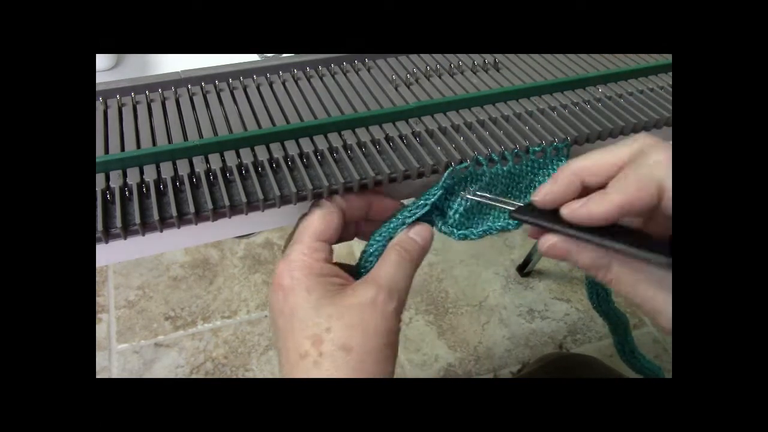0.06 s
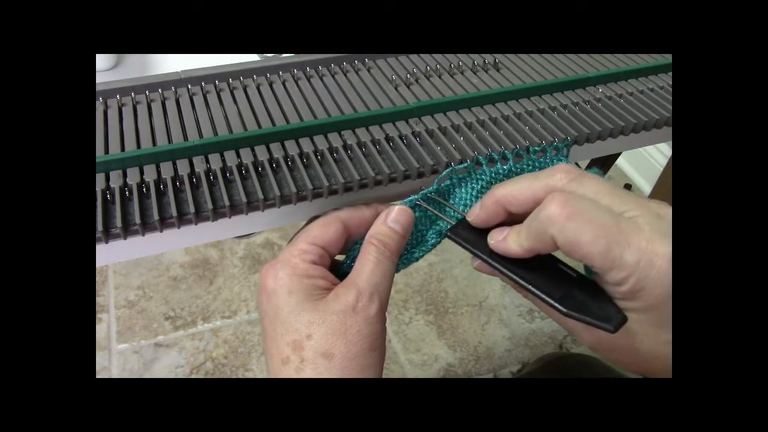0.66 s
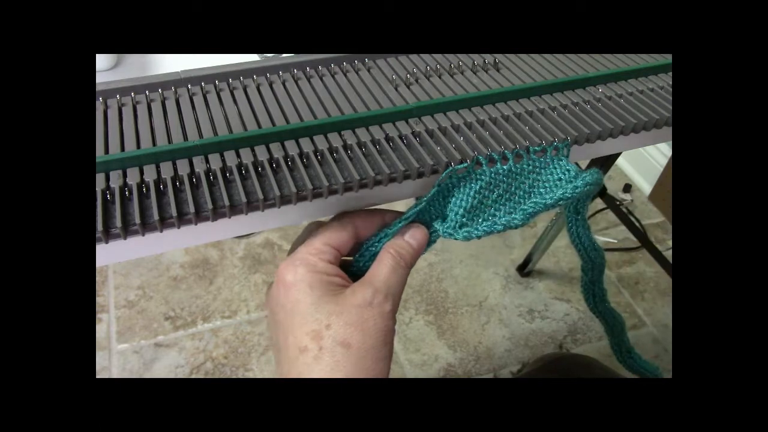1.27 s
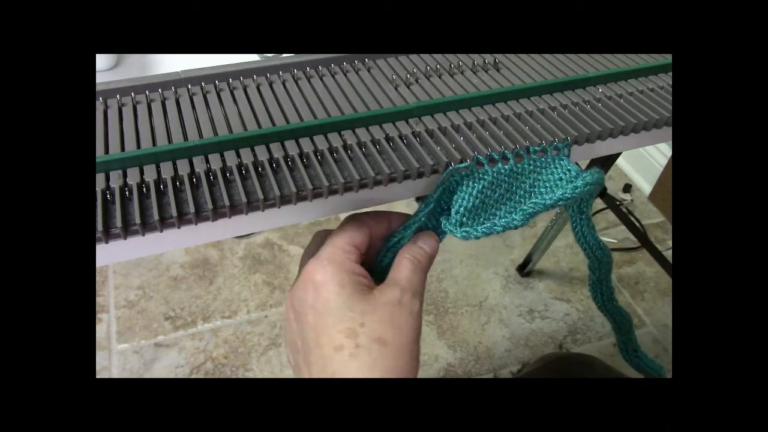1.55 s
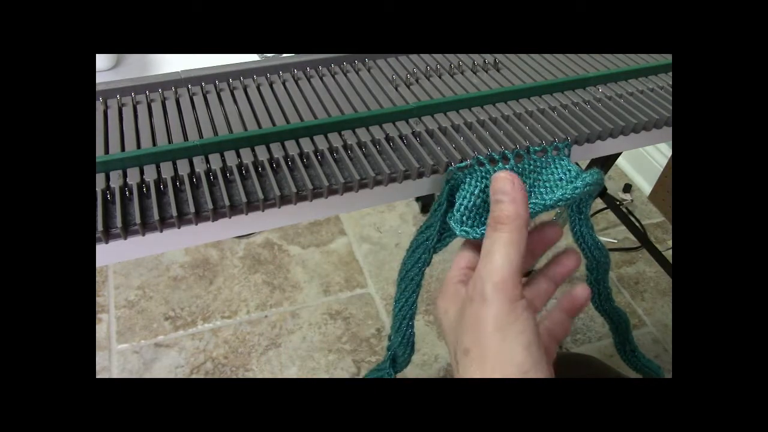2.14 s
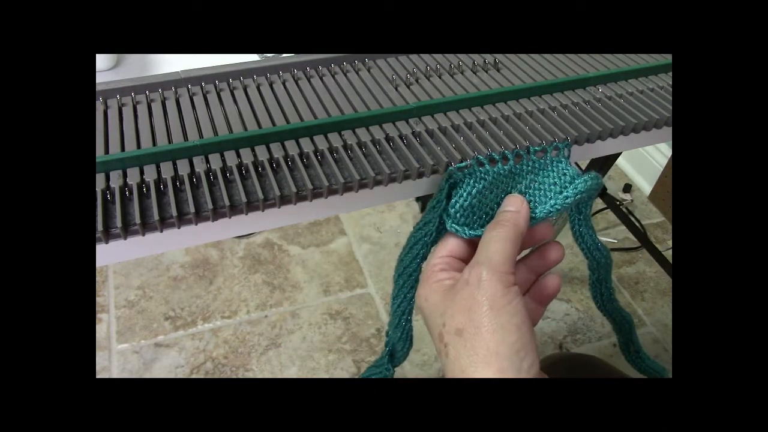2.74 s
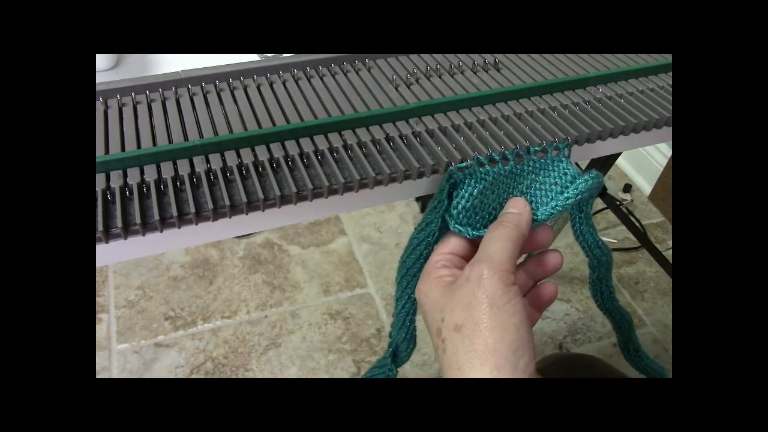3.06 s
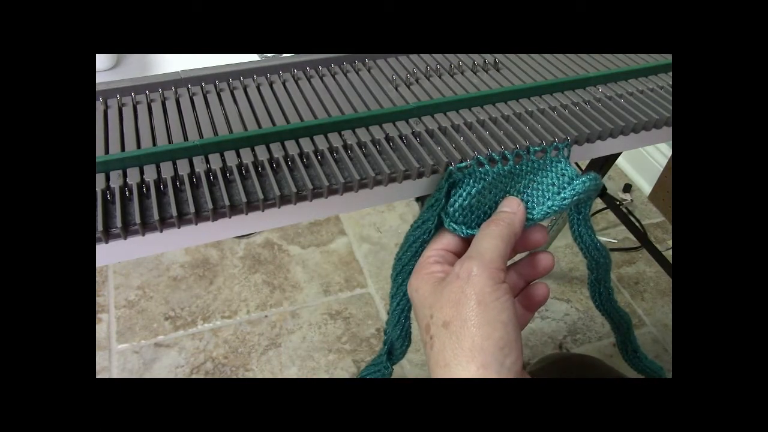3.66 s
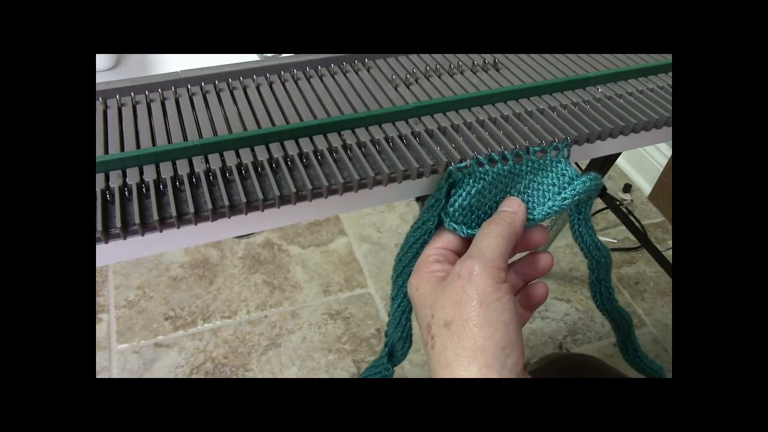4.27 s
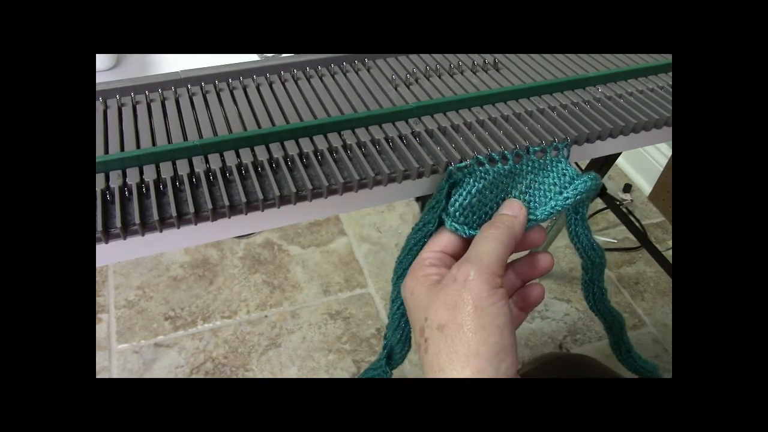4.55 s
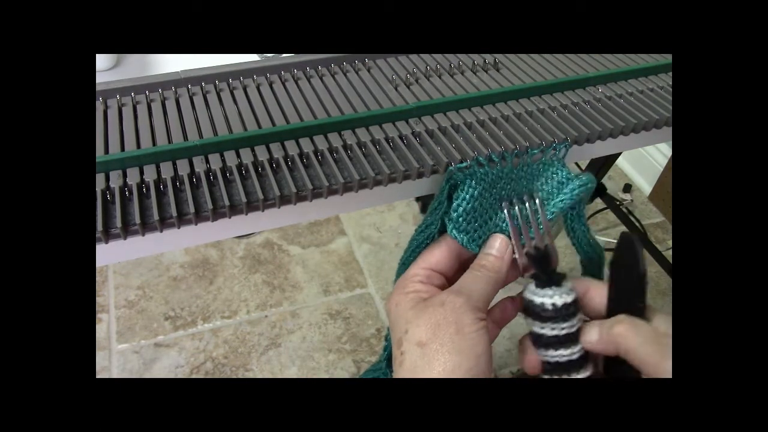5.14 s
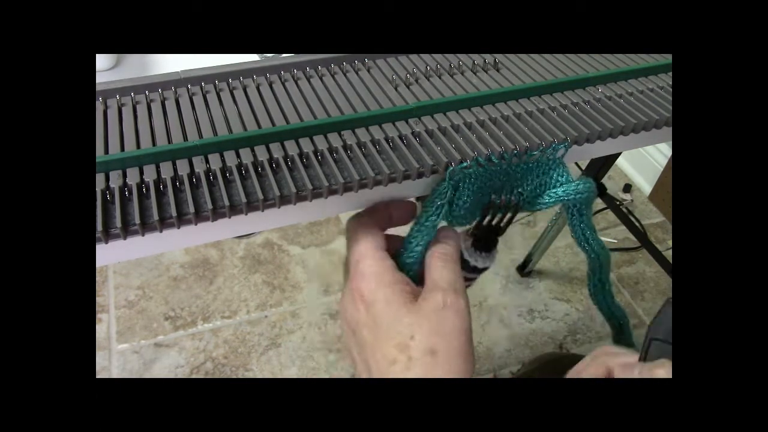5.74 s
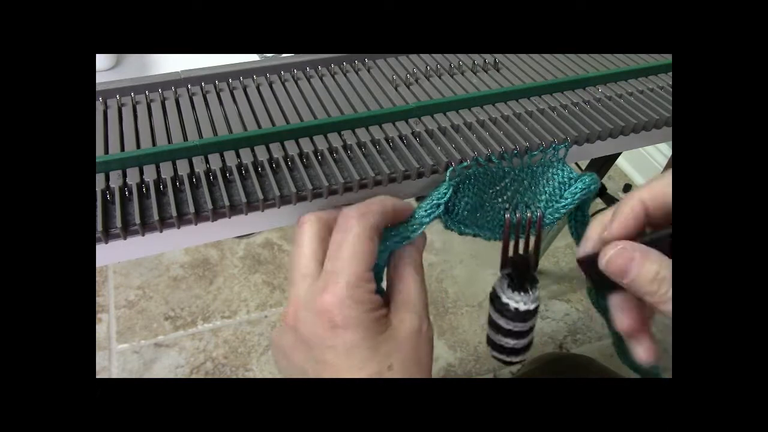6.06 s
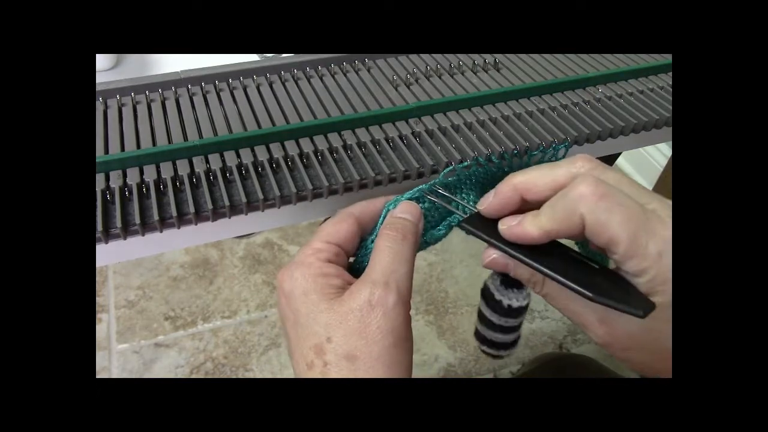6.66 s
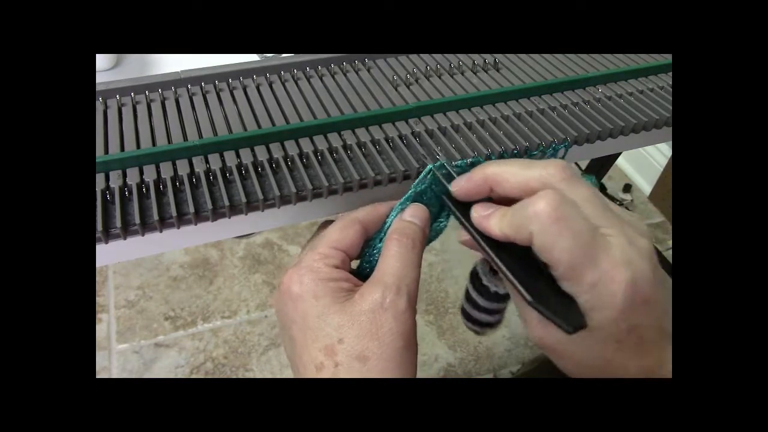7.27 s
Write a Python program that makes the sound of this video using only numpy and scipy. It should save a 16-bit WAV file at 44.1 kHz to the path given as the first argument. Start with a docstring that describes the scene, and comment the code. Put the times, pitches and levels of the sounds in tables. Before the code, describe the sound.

A low, steady hush fills a small, quiet room, and everything is heard close up. In the first second there are faint dull slides and wool rustles, with tiny metal pings around 0.9 to 1.2 seconds. A soft bump comes at 1.5 seconds, followed by a brief dull slide. From 2 to 3.8 seconds a steel tool makes light, irregular ticks, short scrapes and thin pings on knitting machine needles. At 3.9 seconds something heavy lands on a table with a loud, rattling clunk that rings briefly, by far the loudest event. After a lull, yarn rustles faintly from about 5.2 to 6.2 seconds as a claw weight is hooked into the fabric, with two small ticks and a faint ping near 6 seconds. Needle latches click lightly again from 7.1 seconds, the sharpest click coming at 7.5 seconds.

```python
"""Steel tools tick, scrape and ping on the needles of a knitting machine, close by in a small, quiet room.
Impacts excite the modes of the steel; stick-slip friction makes the scrapes and rubs prongs into ringing.
As a claw weight is picked out, something heavy clunks down and bounces, ringing the table top.
Yarn rustles under tension as the claw is hooked into the fabric, then needle latches click again.
Dull slides, a soft bump and a low hush lie behind."""
import sys
import numpy as np
from scipy import signal
from scipy.fft import rfft, irfft, next_fast_len
from scipy.io import wavfile
from scipy.ndimage import uniform_filter1d, minimum_filter1d

SR = 44100
rng = np.random.default_rng(int(sys.argv[2]) if len(sys.argv) > 2 else 0)


def log_audio(samples):
    """Write samples as a 16-bit WAV file to the path given in sys.argv[1]."""
    # one column per channel
    frames = np.atleast_2d(samples).T
    # limit to full scale, then quantise
    limited = np.clip(frames, -1, 1)
    pcm = np.round(limited * 32767).astype(np.int16)
    wavfile.write(sys.argv[1], SR, pcm)


N = 331191
TIME = np.arange(N) / SR
RING_TIME = TIME[:SR // 4]


def steel(body_db, treble_db, hz, crack_t60, ring_db, spot_db):
    """Impact excitation: a crack and a short ring; the point of contact favours one resonance."""
    # Modes of small steel parts. Each row: frequency in Hz, level in dB, t60 in seconds.
    modes = [(1290, 6, 0.016), (1781, -3.5, 0.022), (3066, -5, 0.032), (4070, 2, 0.012), (4640, 1, 0.029),
             (5090, -18, 0.03), (6485, 3, 0.043), (7000, -4.5, 0.0082), (8220, -9.5, .04),
             (10850, 8, 0.057), (11440, -7, 0.039), (13970, -3.5, .03)]
    hit = burst(crack_t60) + undb(ring_db) * ring(modes, scatter_db=4.5, detune=0.018)
    hit = hit + undb(spot_db) * resonance(hit, hz, width_hz=550)
    body = [(30, body_db - 32), (100, body_db - 9), (500, body_db + 10.5), (1400, body_db + 9)]
    treble = [(7500, treble_db + 1), (11500, treble_db - 5.5), (15500, treble_db - 16)]
    return colour(hit, body + [(2800, 1), (5500, -1.4)] + treble)


def tick(db, body_db, treble_db, hz):
    """One impact on steel; db sets its peak in the bright band where hearing is keenest."""
    hit = steel(body_db, treble_db, hz, crack_t60=0.021, ring_db=-7, spot_db=1)
    bright_band = resonance(hit, 2300, width_hz=2900)
    return undb(db) * hit / abs(bright_band).max()


def clicks():
    """Light impacts between latches, prongs and tools set the steel in free vibration."""
    # Each row: start in seconds, bright-band peak, body and treble in dB, favoured resonance in Hz.
    contacts = [(1.995, -41.5, -11, -10, 4220), (2.0582, -42.5, 7, 7, 3100), (2.2575, -42, -14, -3, 3790),
                (2.4892, -33.5, -19, -11, 1340), (2.7634, -34, -12, 7, 6700), (2.804, -34.5, -22, -2, 6500),
                (3.147, -27.5, -14.5, -8.5, 1890), (3.6041, -37, -17, -4, 11000),
                (3.6331, -38, -4, -4, 4140), (3.709, -38, -7, -1.5, 1340), (3.7489, -42.5, -10, -5, 1230),
                (3.8011, -38, -12, -2, 4620), (3.8185, -34, -20, -9.5, 1300),
                (5.246, -41.5, -2.5, -16, 2160), (5.5662, -39.5, 4.5, -8.5, 1498),
                (7.0796, -46, -1, -23, 4100), (7.0858, -33.5, -12, -9, 2650), (7.1165, -43, 6, -7.5, 1604),
                (7.3397, -44, -7.5, 3, 4170), (7.3585, -40.5, -9.5, -27, 2240),
                (7.487, -37.5, -12.5, 4.5, 4110), (7.5004, -23.5, -17.5, -4.5, 4000)]
    out = np.zeros(N)
    for start, db, body_db, treble_db, hz in contacts:
        add(out, start, tick(db, body_db, treble_db, hz))
    return out


def scrapes():
    """Stick-slip friction: tiny slips drive the steel until the sliding part catches with a tick."""
    # Each row: start and catch in seconds, final level, swell, body and treble in dB, resonance in Hz.
    slides = [(2.031, 2.061, -52.5, 0, -11, -12, 3000), (2.089, 2.1465, -36.5, 13, -11, -4, 3930),
              (2.279, 2.318, -36, 8.5, -11.5, -3.5, 3320), (2.49, 2.525, -48, -2, -10, -3, 4700),
              (2.734, 2.769, -36.5, 17, -8.5, 1.5, 6600), (2.854, 2.953, -50, 2.5, -4, -3.5, 3400),
              (2.973, 2.997, -36.5, 9, -10, -4, 3060), (3.454, 3.519, -53.5, 0.5, -6.5, -10.5, 4200),
              (3.796, 3.88, -52.5, -5, -4.5, -5.5, 4580), (3.885, 3.894, -25.5, 21.5, -7, -18.5, 1778),
              (4.468, 4.517, -61, -4, -26, -8, 4470)]
    overlap_s, catch_db = 0.004, 8  # the tick leads the catch, and the sliding outlasts it, by overlap_s
    out = np.zeros(N)
    for start, catch, db, swell_db, body_db, treble_db, hz in slides:
        progress = RING_TIME / (catch - start)
        onset = np.minimum(RING_TIME / 0.015, 1)
        sliding = start + RING_TIME < catch + overlap_s
        pressure = undb(swell_db * np.minimum(progress - 1, 0)) * onset * sliding
        slips = level(grains(len(RING_TIME), per_s=3000, spread_db=4.5), db) * pressure
        response = unit(steel(body_db, treble_db, hz, crack_t60=0.006, ring_db=-17, spot_db=-10))
        add(out, start, signal.fftconvolve(slips, response))
        add(out, catch - overlap_s, tick(db + catch_db, body_db, treble_db, hz))
    return out


def pings():
    """Forced, then free vibration: friction drives a thin prong ever harder until it slips and rings."""
    # Each row: release in seconds, pitch in Hz, peak in dB, time constant of the rub in seconds.
    releases = [(.934, 3540, -46.5, 0.0026), (1.151, 4080, -35.5, 0.0029), (1.15, 5920, -43, 0.01),
                (1.184, 4040, -52, .006), (2.146, 11150, -28, 0.004), (2.313, 11540, -35.5, 0.011),
                (2.49, 1320, -34, .001), (2.768, 13400, -35, 0.0047), (2.805, 6680, -34, 0.002),
                (3.149, 2050, -32, 0.0014), (3.712, 1350, -40.5, .001), (3.711, 4660, -41, 0.0015),
                (6.021, 2347, -47.5, .02), (6.022, 10000, -53.5, 0.0099)]
    out = np.zeros(N)
    for release, hz, db, rub_s in releases:
        rub = rng.standard_normal(len(RING_TIME)) * np.exp((RING_TIME - RING_TIME[-1]) / rub_s)
        tone = signal.fftconvolve(rub, damped_sine(hz, t60=0.025))
        add(out, release - RING_TIME[-1], undb(db) * tone / abs(tone).max())
    return out


def blows(count):
    """Inelastic bouncing: one edge touches, then the heavy thing lands and chatters ever more weakly."""
    touch_s, touch_db, land_s, land_db = 3.8925, 9.5, 3.8995, 18.5
    gap_s, jitter_s, loss_db = 0.0043, 0.0005, 2.44
    soft_hz, hard_hz, harden_s = 800, 7000, 0.005  # the treble cutoff rises as the contact hardens
    bounce = np.arange(count)
    elapsed = bounce * gap_s
    corner_hz = hard_hz + (soft_hz - hard_hz) * np.exp(-elapsed / harden_s)
    times = land_s + elapsed + jitter_s * rng.standard_normal(count)
    return [(touch_s, touch_db, soft_hz), *zip(times, land_db - loss_db * bounce, corner_hz)]


def clunk():
    """Quick blows excite the table's modes; a soft contact acts as a low-pass filter."""
    # Modes of the table top. Each row: frequency in Hz, level in dB, t60 in seconds.
    modes = [(136, -7, 0.2), (184.2, -7, 0.12), (312.9, -12, 0.65), (400, -8, 0.1), (507, 2.5, 0.32),
             (542, -1.5, 0.11), (613, -2, 0.051), (687, 0, 0.08), (790, 4, 0.06), (850, -1, 0.1),
             (977, -9.5, 0.086), (1130, -8, 0.091), (1372, -3, 0.23), (1503, 3, 0.11), (2180, -1.5, 0.12),
             (2470, -8.5, 0.18), (3490, -7, 0.052), (5013, -8.5, .05)]
    # Spectrum of the clatter. Each row: frequency in Hz, gain in dB.
    clatter_spectrum = [(30, -33.5), (65, -27), (105, -0.5), (190, -6), (340, -5), (480, 5.5), (750, 5.5),
                        (1500, -2), (2700, -3), (4000, -4), (7000, -8), (10000, -15.5), (15000, -28.5)]
    # The table is too small to radiate deep bass. Each row: frequency in Hz, gain in dB.
    bass_loss = [(40, -32), (72, -21), (112, -3), (180, 1)]
    out = np.zeros(N)
    for start, db, corner_hz in blows(count=11):
        clatter = unit(colour(burst(t60=0.08), clatter_spectrum))
        hit = clatter + undb(-6.5) * ring(modes, scatter_db=5.5, detune=0.0018)
        pole = np.exp(-2 * np.pi * corner_hz / SR)
        add(out, start, undb(db) * signal.lfilter([1 - pole], [1, -pole], hit))
    return colour(out, bass_loss)


def yarn():
    """Fibre friction: yarn drawn over fingers and prongs rustles louder with tension, then slips."""
    # Each row: slip time in seconds, level at full tension in dB, rise in seconds, treble in dB.
    strokes = [(.31, -68, .16, -1), (0.934, -55, .015, 3), (1.105, -55, .05, 0), (1.148, -53.5, 0.015, 7),
               (1.278, -60.5, 0.02, 1), (5.48, -55, .32, -12), (5.761, -62.5, .06, -3.5),
               (5.915, -60.5, .05, -5), (6.02, -62.5, 0.058, -5), (6.155, -63, 0.041, 0.5)]
    # Spectrum of rubbing wool. Each row: frequency in Hz, gain in dB.
    wool_spectrum = [(60, -36), (300, -8), (1500, -16), (3000, -5), (5000, -9), (7300, -2.5), (10000, -6),
                     (13000, -10), (16000, -30)]
    relax_share, rustle_exponent = 0.1, 0.75
    out, t = np.zeros(N), TIME[:SR // 2]
    for slip, db, rise_s, treble_db in strokes:
        tension = np.interp(t / rise_s, [0, 1, 1 + relax_share], [0, 1, 0])
        fibres = colour(grains(len(t), per_s=14000, spread_db=2.5), wool_spectrum)
        fibres = colour(fibres, [(7500, 0), (12000, treble_db)])
        add(out, slip - rise_s, level(fibres, db) * tension ** rustle_exponent)
    return out


def handling():
    """Sliding friction on the table gives dull swells of noise; one soft impact gives a bump."""
    # Each row: start in seconds, level in dB, time until the decay begins in seconds.
    slides = [(0, -62.5, 0.34), (0.803, -61.5, 0.24), (1.631, -43.5, 0.061), (1.86, -54.5, 0.018),
              (5.214, -58, 0.085)]
    # Spectra of the sliding and of the bump. Each row: frequency in Hz, gain in dB.
    slide_spectrum = [(35, -66.5), (60, -35), (112, -28.5), (217, -12.5), (246, -22.5), (326, -18.5),
                      (479, -4), (533, -6), (674, -24.5), (766, -8.5), (835, -19.5), (1700, -24),
                      (3580, -33), (10000, -51), (13000, -88), (22000, -120)]
    bump_spectrum = [(35, -53), (60, -37), (237, 6), (403, -6), (672, 3), (859, -11), (1990, -17.5),
                     (3320, -14), (6520, -40), (8000, -41), (10400, -68), (17600, -120)]
    push = sum(undb(db) * swell(TIME - start, attack_s=0.028, hold_s=hold_s, t60=0.52)
               for start, db, hold_s in slides)
    friction = colour(grains(N, per_s=4700, spread_db=1.5), slide_spectrum)
    out = level(friction, 0) * push
    bump = unit(colour(burst(t60=0.077), bump_spectrum))
    add(out, 1.523, undb(-15) * bump)
    return out


def diffuse_tail():
    """Reverberation: reflections build up, then absorption damps them, soonest in the treble."""
    # Decay of the room. Each row: frequency in Hz, t60 in seconds.
    decay_times = [(100, 0.43), (300, 0.34), (800, 0.5), (2000, 0.43), (5000, 0.31), (12000, 0.25)]
    hz, t60 = np.transpose(decay_times)
    t = TIME[:SR * 2 // 3]
    build_up = 1 - np.exp(-(t / 0.0037) ** 2)
    reflections = sum(band * fade(t, np.interp(np.log(centre), np.log(hz), t60))
                      for centre, band in octaves(rng.standard_normal(len(t))))
    return unit(build_up * reflections)


def room(x, wet_db, side_db, ports_db):
    """Direct and diffuse sound superpose, nearly alike at two closely spaced microphone ports."""
    mid, side = (undb(wet_db) * signal.fftconvolve(x, diffuse_tail())[:N] for _ in range(2))
    # short waves bend round the housing differently to each port
    diffracted = signal.fftconvolve(x, burst(t60=0.008))[:N]
    side = undb(side_db) * side + undb(ports_db) * diffracted
    side = colour(side, [(200, -12.5), (700, -12.5), (1800, -8.5), (7000, 0.5)])
    return x + mid + side * np.array([[1], [-1]])


def hush():
    """Ambient noise, partly correlated between channels, wavers in each octave and slowly eases."""
    # Spectrum of the room noise. Each row: frequency in Hz, gain in dB.
    spectrum = [(20, -21.0), (50, -14.3), (85, -4.2), (130, -5.5), (220, -2.1), (340, 0.0), (470, -4.3),
                (700, -8.3), (1300, -13.6), (3000, -18.3), (6000, -22.6), (10500, -29.6), (13000, -35.2),
                (16000, -39.0)]
    raised_db, ease_db_per_s = 1.5, 0.19

    def noise():
        """Random noise with slight amplitude modulation in each band."""
        bands = octaves(colour(rng.standard_normal(N), spectrum))
        return level(sum(band * undb(0.3 * walk(rate=3.1)) for _, band in bands), -59)

    side = colour(noise(), [(30, -1.5), (90, -11), (350, -10), (700, -5.5), (2000, -6), (8000, -10.5)])
    mid = noise() * undb(raised_db - ease_db_per_s * TIME)
    return mid + side * np.array([[1], [-1]])


def ring(modes, scatter_db, detune):
    """Modal superposition: each blow meets a new spot, so the modes vary in strength and sign."""
    draws = rng.standard_normal((len(modes), 3))
    out = np.zeros(len(RING_TIME))
    for (hz, db, t60), (strength, shift, polarity) in zip(modes, draws):
        mode = unit(damped_sine(hz * (1 + detune * shift), t60))
        out += np.sign(polarity) * undb(db + scatter_db * strength) * mode
    return unit(out)


def damped_sine(hz, t60):
    """Impulse response of a single mode."""
    return np.sin(2 * np.pi * hz * RING_TIME) * fade(RING_TIME, t60)


def burst(t60):
    """Modal overlap: modes too dense to tell apart decay as noise."""
    return unit(rng.standard_normal(len(RING_TIME)) * fade(RING_TIME, t60))


def grains(count, per_s, spread_db):
    """Shot noise: tiny slips of uneven size at random times."""
    sizes = rng.standard_normal(count) * undb(spread_db * rng.standard_normal(count))
    return sizes * (rng.random(count) < per_s / SR)


def walk(rate):
    """Linear interpolation between random values, drawn rate times a second."""
    step = int(SR / rate)
    return uniform_filter1d(np.repeat(rng.standard_normal(N // step + 1), step), step)[:N]


def fade(t, t60):
    """Exponential decay by 60 dB in t60 seconds."""
    return np.exp(-np.log(1000) * t / t60)


def swell(t, attack_s, hold_s, t60):
    """Linear attack from t = 0, exponential decay from hold_s on."""
    return np.clip(t / attack_s, 0, 1) * fade(np.maximum(t - hold_s, 0), t60)


def resonance(x, hz, width_hz):
    """Second-order resonator with a gain of one at its centre."""
    return signal.lfilter(*signal.iirpeak(hz, hz / width_hz, fs=SR), x)


def colour(x, points, size=4096):
    """Minimum-phase filter through (Hz, dB) points, built by folding the cepstrum."""
    hz, db = np.transpose(points)
    grid = np.maximum(np.arange(size // 2 + 1) * SR / size, 1)
    gain = undb(np.interp(np.log(grid), np.log(hz), db))
    cepstrum = irfft(np.log(gain))
    cepstrum[1:size // 2] *= 2
    cepstrum[size // 2 + 1:] = 0
    response = irfft(np.exp(rfft(cepstrum)))
    return signal.fftconvolve(x, response)[:len(x)]


def octaves(x):
    """Filter bank of overlapping octaves, as pairs of centre in Hz and signal."""
    size = next_fast_len(len(x), True)
    spectrum = rfft(x, size)
    octave = np.log2(np.maximum(np.arange(len(spectrum)) * SR / size, 32))
    return [(2. ** k, irfft(spectrum * np.maximum(1 - abs(octave - k), 0), size)[:len(x)])
            for k in range(5, 15)]


def undb(db):
    """Decibels to amplitude ratio."""
    return 10 ** (np.asarray(db) / 20)


def unit(x):
    """Normalise to an energy of one."""
    return x / np.sqrt(np.sum(x ** 2))


def level(x, db):
    """Normalise to an rms level."""
    return unit(x) * np.sqrt(len(x)) * undb(db)


def add(out, start, x):
    """Superpose x on out from start, in seconds."""
    i = int(start * SR)
    out[i:i + len(x)] += x[:len(out) - i]


def scene():
    """The sources superpose in one room; prongs and clunk have the highest share of direct sound."""
    balance = undb([[0.07], [-0.07]])  # a trace to the left
    prongs = room(pings(), wet_db=-12.5, side_db=-14, ports_db=-14)
    handwork = room(clicks() + scrapes() + handling() + yarn(), wet_db=-7, side_db=-14, ports_db=-13.5)
    landing = room(clunk(), wet_db=-14, side_db=-14, ports_db=-10.5)
    return prongs + handwork * balance + landing + hush()


def record(dry):
    """Peak limiting holds down the loudest samples; a low-pass filter cuts the highest treble."""
    ceiling, window_samples, top_hz = 0.8, 89, 15700
    allowed = ceiling / np.maximum(abs(dry).max(axis=0), ceiling)
    gain = uniform_filter1d(minimum_filter1d(allowed, window_samples), window_samples)
    return signal.sosfilt(signal.ellip(8, 0.2, 70, top_hz, fs=SR, output="sos"), dry * gain)


dry = scene()
out = record(dry)
log_audio(out)
```